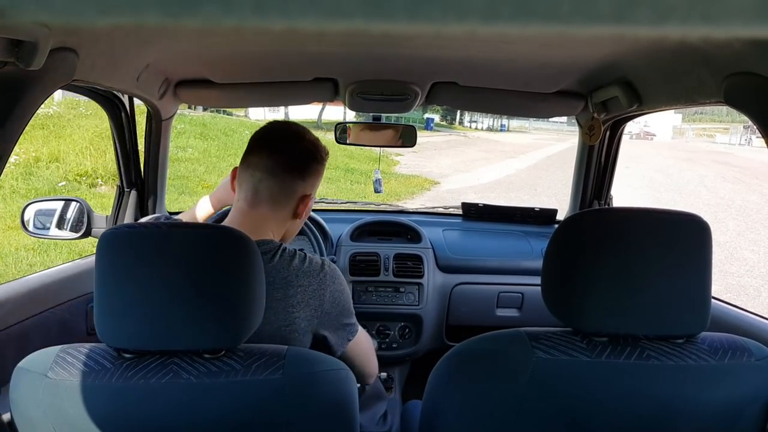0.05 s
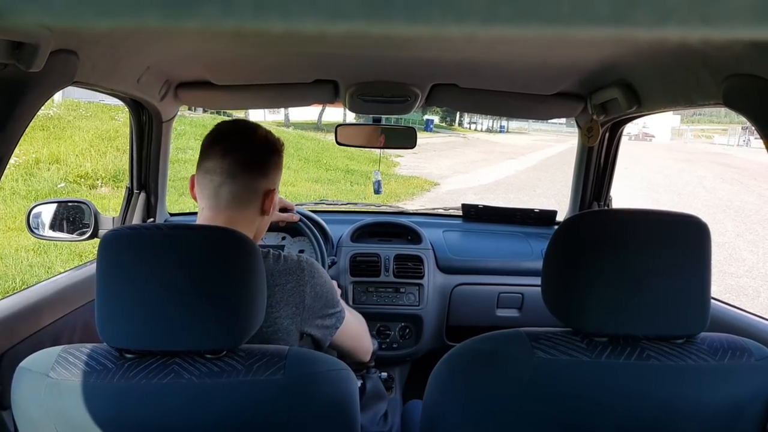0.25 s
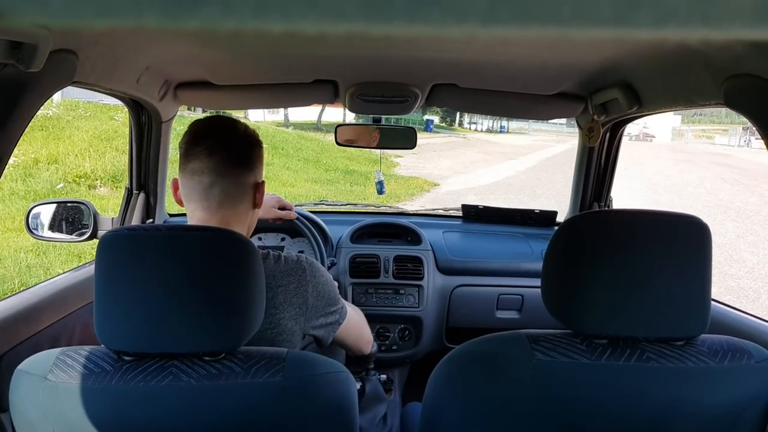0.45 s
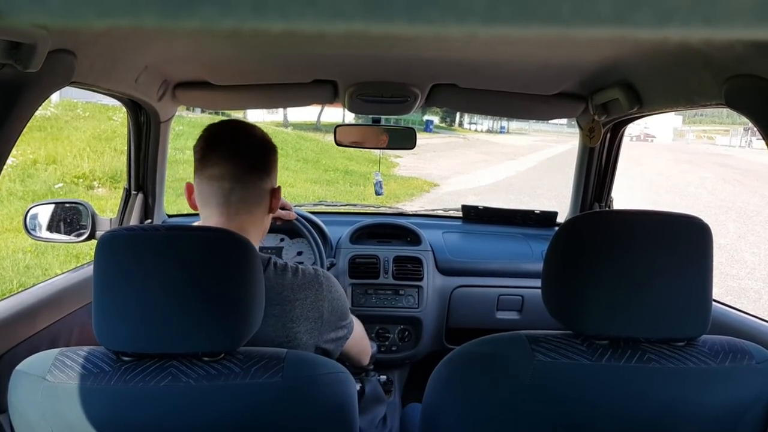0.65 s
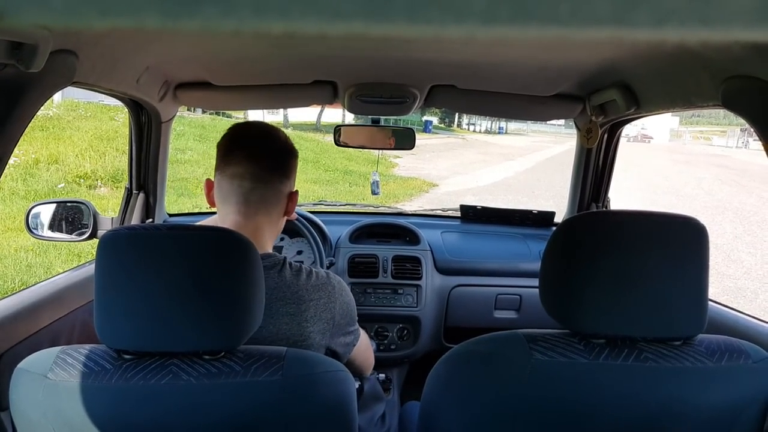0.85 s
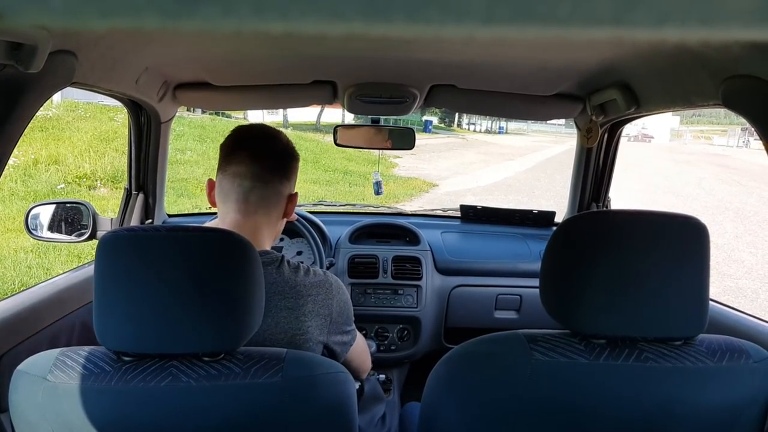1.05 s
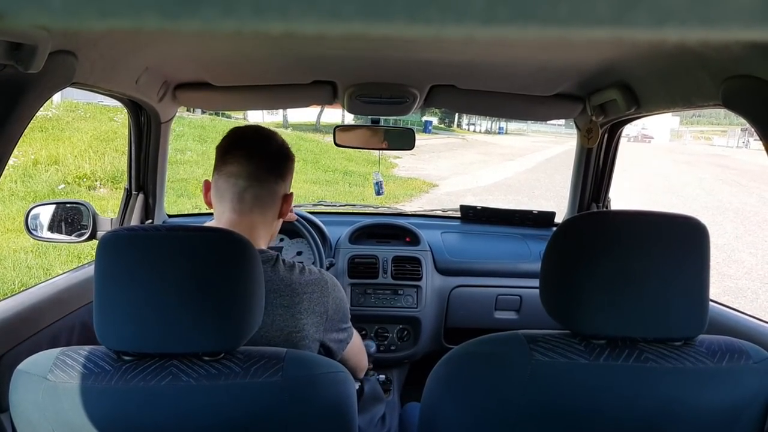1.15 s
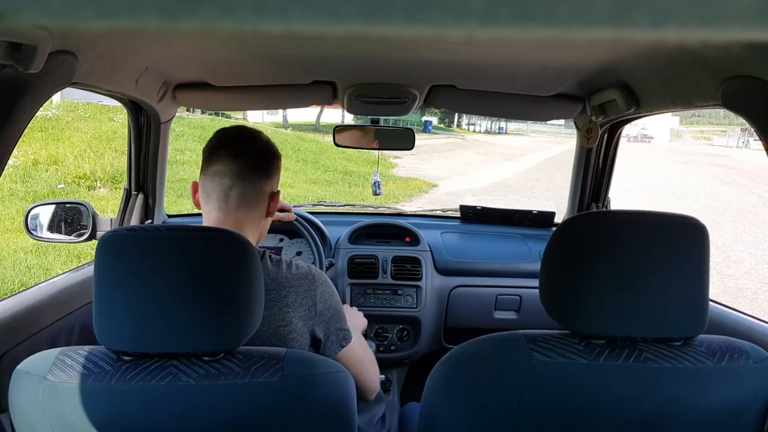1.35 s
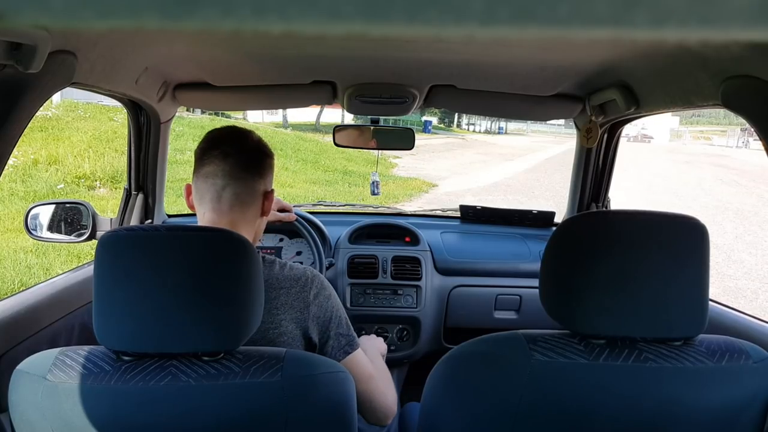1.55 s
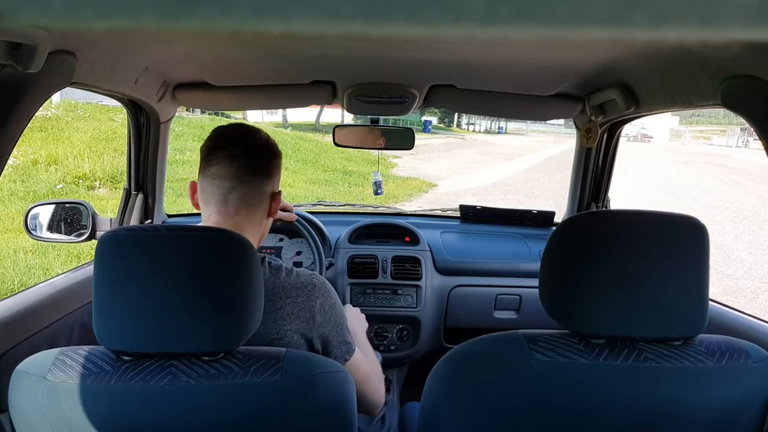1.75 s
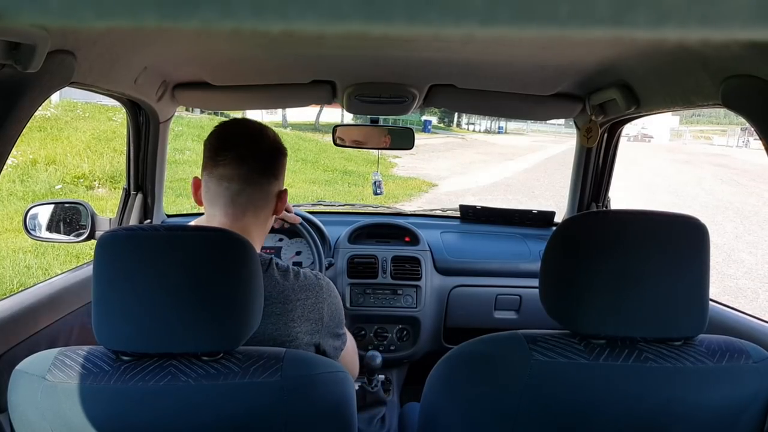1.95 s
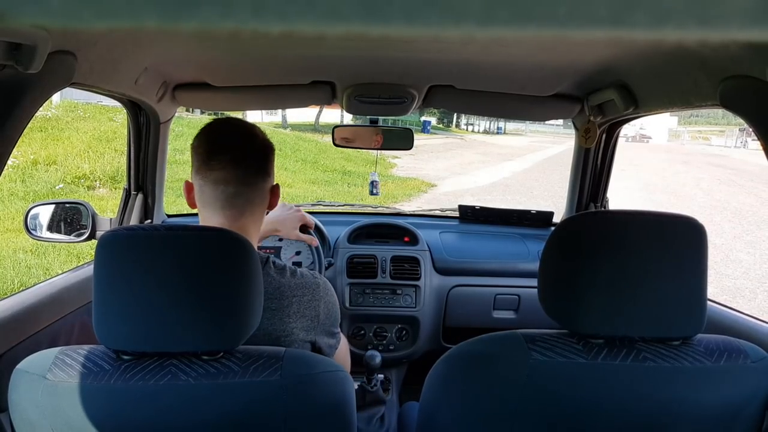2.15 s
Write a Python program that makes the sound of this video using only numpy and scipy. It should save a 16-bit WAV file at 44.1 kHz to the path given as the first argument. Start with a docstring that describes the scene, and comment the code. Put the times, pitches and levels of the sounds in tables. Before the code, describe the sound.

A car door slams shut from inside the cabin, then keys jingle and click in the ignition

```python
"""Car door slam and ignition key

Inside a small car, a stick-slip hinge creak leads to latch and slam: shaped noise, cabin modes and rattles.
The driver settles with dull bumps of low notes and noise; rumble, shuffling and cloth are coloured noise.
Key and lock scrape and click as filtered noise, and the bunch scrapes and jingles on ringing modes.
With the ignition on, the fuel pump's hum swells in as one slightly unsteady sine."""
import sys
import numpy as np
from scipy import signal
from scipy.fft import rfft, irfft, next_fast_len
from scipy.io import wavfile
from scipy.ndimage import map_coordinates

SR = 44100
rng = np.random.default_rng(int(sys.argv[2]) if len(sys.argv) > 2 else 0)


def dump(signal):
    """Clip the signal to [-1, 1] and save it as 16-bit WAV at the path in sys.argv[1]."""
    limited = np.clip(np.atleast_2d(signal).T, -1, 1)
    pcm = np.round(limited * 32767).astype(np.int16)
    wavfile.write(sys.argv[1], SR, pcm)


N = 97020  # samples

# Body rumble: (time [s], level [dB]) and its colour (frequency [Hz], level per Hz [dB])
RUMBLE_LEVEL = [(.2, -44), (.8, -63), (1.15, -37), (1.48, -51.5), (1.55, -31.5), (1.72, -23.5), (2.0, -39)]
RUMBLE_SPECTRUM = [(22, -6), (60, -2.5), (110, -14)]
# The driver's movement: (time [s], level [dB]) and its colour (frequency [Hz], level per Hz [dB])
SHUFFLE_LEVEL = [(.2, -42.5), (.9, -42.5), (1.1, -35.5), (1.3, -38), (1.85, -29.5), (1.97, -39.5)]
SHUFFLE_SPECTRUM = [(110, 13), (175, 6.5), (430, -17.5), (600, -17), (1100, -33.5), (2000, -41.5)]
# Rustle of the sleeve: (time [s], level [dB]) and its colour (frequency [Hz], level per Hz [dB])
CLOTH_LEVEL = [(0, -63), (.05, -54), (.55, -70), (.85, -60), (.93, -65.5), (1.9, -62.5)]
CLOTH_SPECTRUM = [(3500, -7.5), (14000, -7)]
# Outdoor noise through the open door: (frequency [Hz], level per Hz [dB])
OUTSIDE_SPECTRUM = [(200, 0), (700, -4.5), (2500, -26.5)]
OUTSIDE_DB = -46.5
# Stereo width of all noise: (frequency [Hz], side over mid [dB])
STEREO_WIDTH = [(40, -43.5), (140, -15), (550, -8), (1000, 0)]

PUMP_S, PUMP_RISE_S, PUMP_HZ, PUMP_DB = 1.433, 0.23, 252.6, -38.5

# Dull bumps of pedals, seat and gear lever: (time [s], level [dB], pitch [Hz])
BUMP_HITS = [(.082, -30, 148.7), (0.708, -34.5, 162.6), (.939, -20.5, 181.7), (1.222, -28, 207),
             (1.348, -24, 135), (1.535, -24.5, 155.4), (1.769, -24.5, 165.7), (1.874, -22.5, 169.4),
             (2.0, -28, 189)]
# Noise of a bump: (frequency [Hz], level per Hz [dB])
BUMP_SPECTRUM = [(100, 0), (230, -3), (400, -17.5), (1700, -52), (12000, -57.5)]

# Keys knocking together: (time [s], level [dB])
KEY_CONTACTS = [(1.345, -35), (1.515, -27), (1.575, -38.5), (1.617, -40), (1.661, -18.5), (1.680, -18.5),
                (1.692, -21.5), (1.757, -21), (2.046, -26), (2.098, -24)]
# Ringing modes of the keys: (frequency [Hz], level [dB], t60 [s])
KEY_MODES = [(6735, -17, .12), (7750, -11, .15), (10850, -8, .11), (12050, -7, .08), (13160, -3, .09),
             (14990, 2, .08)]
# Grainy clash of metal: (frequency [Hz], level per Hz [dB])
CLASH_SPECTRUM = [(3300, -12), (9500, -15), (11200, 3.5), (15500, -13.5)]
KEY_HARD_DB = -10.5  # contact level at which the key modes keep their listed balance
KEY_BRIGHTENING = 0.44  # dB per octave of tilt for each dB harder

# Clicks of key and lock: (time [s], plastic level [dB], snap level [dB], metal tick level [dB])
LOCK_CLICKS = [(0.605, -55, -65, -42), (.648, -36.5, -69, -56), (.726, -34, -39.5, -29.5),
               (1.107, -29.5, -40, -38), (1.157, -28.5, -34.5, -32.5), (1.226, -27.5, -31.5, -33.5),
               (1.265, -51, -47.5, -46.5), (1.484, -25, -18.5, -33), (1.498, -23, -36.5, -37.5),
               (1.599, -30.5, -39.5, -59), (2.038, -33, -34.5, -22), (2.091, -23, -20, -22),
               (2.127, -40, -31, -48)]
# Scraping of the key in the lock and of the keys against each other:
# (start [s], end [s], plastic level [dB], metal level [dB])
KEY_SCRAPES = [(1.076, 1.282, -41.5, -50), (1.631, 1.816, -49, -42), (2.018, 2.079, -33.5, -34.5)]
# Steering column, lock housing and metal tick: each (frequency [Hz], level per Hz [dB])
PLASTIC_SPECTRUM = [(440, -0.5), (590, 21), (850, -18), (1090, 9), (1350, -48)]
SNAP_SPECTRUM = [(800, 1.5), (1130, 7.5), (1350, -6.5), (1700, -1.5), (2900, -19), (5400, -7)]
TICK_SPECTRUM = [(2000, -6.5), (4600, 5), (6200, -1), (7600, 12), (9000, 3.5), (14000, 8.5)]

# Hinge creak as the door swings: (time [s], pitch [Hz], level [dB])
HINGE_CREAK = [(.14, 815, -49), (.170, 840.5, -30), (.19, 879, -37), (.208, 855, -33.5),
               (.226, 1100, -18.5)]
CREAK_OVERTONE_DB = -17  # beside the fundamental
CREAK_GRIT_DB = -12  # beside the tonal squeak

# Latch and slam: each (frequency [Hz], level per Hz [dB])
LATCH_SPECTRUM = [(120, 4), (430, -11), (600, -2.5), (850, -10), (1150, -11.5), (1600, -30.5),
                  (3500, -40.5), (8000, -55)]
SLAM_SPECTRUM = [(25, 5.5), (140, 3.5), (300, -7), (470, -16), (600, -3.5), (800, -15), (1100, -16.5),
                 (1500, -29), (14000, -91.5)]
# Decay of the slam: (frequency [Hz], t60 [s])
SLAM_DECAY = [(40, 1), (900, 0.39), (4000, 0.93)]
# Air modes of the closed cabin: (frequency [Hz], level [dB], t60 [s])
CABIN_MODES = [(58.14, -5, 0.92), (133.3, 1, 0.4), (161.7, -10.5, 0.79), (236.2, -10, 0.41)]
# Clatter of the door and its trim: (time [s], level [dB])
RATTLE_HITS = [(0.245, -7.5), (.305, -21.5), (.345, -18), (.385, -25), (.447, -28)]
# Rattling trim: (frequency [Hz], level per Hz [dB])
RATTLE_SPECTRUM = [(500, 16.5), (1100, 1), (1700, -5.5), (4800, -11), (15000, -29.5)]
LATCH_S, LATCH_DB, LATCH_T60_S = .2265, -5.5, 0.12
SLAM_S, SLAM_DB, SLAM_HOLD_S = .243, -9.5, 0.037
BOOM_DB, BOOM_RISE_S = -2, 0.011
CHATTER_DB, CHATTER_FALL_DB_PER_S, CHATTER_FADE_S = -29.5, 63, 0.443  # the last is when the fade-out starts

TOP_HZ = 15850  # band limit


def amp(db):
    """Turn decibels into gain."""
    return 10 ** (np.asarray(db) / 20)


def unit(x):
    """Scale to rms 1."""
    return x / np.sqrt(np.mean(x ** 2) + 1e-20)


def along(points, hz):
    """Read (Hz, value) points along a log frequency axis."""
    f, v = np.transpose(points)
    return np.interp(np.log(hz + 1), np.log(f + 1), v)


def curves(rows):
    """Draw one automation curve for each column after the time."""
    times, *columns = np.transpose(rows)
    return [np.interp(np.arange(N) / SR, times, column) for column in columns]


def wobble(rate):
    """Draw a smooth random curve with rate knots a second."""
    knots = rng.standard_normal(4096)
    return map_coordinates(knots, [np.arange(N) * rate / SR], mode="wrap")


def add(out, s, x):
    """Mix x into out from time s."""
    i = max(0, round(s * SR))
    out[:, i:i + x.shape[1]] += x[:, :max(0, N - i)]


def pan(x, left_db):
    """Lean a stereo sound to the left by a level difference; negative leans right."""
    return x * amp([[left_db / 2], [-left_db / 2]])


def noise(spectrum, size=N):
    """Random-phase stereo noise of rms 1, narrow in the bass and wide in the treble."""
    hz = np.fft.rfftfreq(size, 1 / SR)
    low_skirt = 1 / (1 + (spectrum[0][0] / (hz + 1)) ** 6)
    high_skirt = 1 / (1 + (hz / spectrum[-1][0]) ** 8)
    colour = low_skirt * high_skirt * amp(along(spectrum, hz))
    phases = np.exp(2j * np.pi * rng.random((2, len(hz))))
    side_gain = amp(along(STEREO_WIDTH, hz))
    mid, side = irfft(phases * colour * [np.ones(len(hz)), side_gain], size)
    return unit(np.array([mid + side, mid - side]))


def burst(spectrum, t60, rise_s, tail_db):
    """A knock on dense resonances: decaying noise with the cabin's short tail."""
    t = np.arange(SR // 3) / SR
    attack = (1 - np.exp(-t / rise_s)) ** 2
    decay = amp(-60 * t / t60) + amp(tail_db - 60 * t / 0.25)
    return noise(spectrum, size=len(t)) * attack * decay


def ring(modes, rise_s, spread, scatter_db=0, detune=0):
    """Decaying sine modes; spread [rad] scales a random phase in each ear."""
    t = np.arange(SR) / SR
    attack = (1 - np.exp(-t / rise_s)) ** 2
    chance = rng.standard_normal((len(modes), 4, 1))  # level, tuning, left phase, right phase
    total = np.zeros((2, len(t)))
    for (hz, db, t60), c in zip(modes, chance):
        decay = amp(db + scatter_db * c[0] - 60 * t / t60)
        total += decay * np.sin(2 * np.pi * hz * (1 + detune * c[1]) * t + spread * c[2:])
    return attack * total


def background():
    """Coloured noise for body rumble, the driver's shuffling and sleeve, and outdoors until the door shuts."""
    t = np.arange(N) / SR
    unrest_db = 2 * wobble(30)
    rumble = amp(curves(RUMBLE_LEVEL)[0]) * noise(RUMBLE_SPECTRUM)
    shuffle = amp(curves(SHUFFLE_LEVEL)[0] + unrest_db) * noise(SHUFFLE_SPECTRUM)
    cloth = amp(curves(CLOTH_LEVEL)[0] + wobble(47)) * noise(CLOTH_SPECTRUM)
    door_open = np.clip((SLAM_S - t) / .02, 0, 1)
    outside = amp(OUTSIDE_DB) * door_open * noise(OUTSIDE_SPECTRUM)
    return pan(rumble + shuffle + cloth + outside, left_db=1.5)


def pump():
    """The fuel pump swells in as a hum, slightly unsteady in pitch and level."""
    on = np.clip((np.arange(N) / SR - PUMP_S) / PUMP_RISE_S, 0, 1)
    phase = 2 * np.pi * np.cumsum(PUMP_HZ * (1 + .004 * wobble(20))) / SR
    return amp(PUMP_DB + wobble(12)) * on * np.sin(phase)


def bumps():
    """Soft blows on the floor and console, each a short low note with a dull noise burst."""
    out = np.zeros((2, N))
    for s, db, hz in BUMP_HITS:
        add(out, s, amp(db + 12.5) * ring([(hz, 0, .11)], rise_s=0.0097, spread=0.14))
        add(out, s, amp(db + 5) * burst(BUMP_SPECTRUM, t60=0.099, rise_s=0.0082, tail_db=-27))
    return out


def jingle():
    """Every contact in the bunch rings the keys anew over a grainy clash; harder contacts ring brighter."""
    ringing, clash = np.zeros((2, 2, N))
    top_hz = KEY_MODES[-1][0]
    for s, db in KEY_CONTACTS:
        tilt = KEY_BRIGHTENING * (db - KEY_HARD_DB)
        modes = [(hz, level + tilt * np.log2(hz / top_hz), t60) for hz, level, t60 in KEY_MODES]
        add(ringing, s, amp(db - 11) * ring(modes, rise_s=.002, spread=.9, scatter_db=3, detune=.003))
        add(clash, s, amp(db - 7) * burst(CLASH_SPECTRUM, t60=0.06, rise_s=0.0046, tail_db=-23))
    grain = amp(3 * wobble(700))
    return pan((ringing + clash) * grain, left_db=-3)


def clicks_and_scrapes():
    """Clicks join a metal tick, a snap and a plastic knock; key and bunch scrape in swells of noise."""
    smooth = np.zeros((2, N))
    gritty = np.zeros((2, N))
    for s, plastic_db, snap_db, tick_db in LOCK_CLICKS:
        add(smooth, s, amp(plastic_db) * burst(PLASTIC_SPECTRUM, t60=0.076, rise_s=0.0038, tail_db=-12.5))
        add(smooth, s, amp(snap_db) * burst(SNAP_SPECTRUM, t60=0.05, rise_s=0.0023, tail_db=-20))
        add(gritty, s, amp(tick_db) * burst(TICK_SPECTRUM, t60=0.051, rise_s=0.0021, tail_db=-15.5))
    for start, end, plastic_db, metal_db in KEY_SCRAPES:
        progress = np.clip((np.arange(N) / SR - start) / (end - start), 0, 1)
        scrape = amp(plastic_db) * noise(PLASTIC_SPECTRUM) + amp(metal_db) * noise(CLASH_SPECTRUM)
        gritty += np.sin(np.pi * progress) * scrape
    return smooth + gritty * amp(2.5 * wobble(900))


def hinge():
    """Rough stick-slip squeak: a jittery tone with overtones and grit, rising as the door swings shut."""
    hz, db = curves(HINGE_CREAK)
    t = np.arange(N) / SR
    phase = 2 * np.pi * np.cumsum(hz * (1 + .045 * wobble(900))) / SR
    fade_in = np.clip((t - HINGE_CREAK[0][0]) / 0.02, 0, 1)
    fade_out = np.clip((HINGE_CREAK[-1][0] - t) / 0.006 + 1, 0, 1)
    overtones = sum(np.sin(k * phase) / k for k in range(2, 6))
    tone = unit(np.sin(phase) + amp(CREAK_OVERTONE_DB) * overtones)
    squeak = tone + amp(CREAK_GRIT_DB) * noise(RATTLE_SPECTRUM)
    return squeak * fade_in * fade_out * amp(db + 3 * wobble(150))


def latch():
    """The latch catches: one sharp knock of noise on dense resonances."""
    out = np.zeros((2, N))
    knock = burst(LATCH_SPECTRUM, t60=LATCH_T60_S, rise_s=0.0013, tail_db=-47.5)
    add(out, LATCH_S, amp(LATCH_DB) * knock)
    return out


def slam():
    """The door hits its seal: noise that holds, then dies at its own rate in each band."""
    out = np.zeros((2, N))
    hz, t, bands = signal.stft(noise(SLAM_SPECTRUM, size=SR), SR, nperseg=1024)
    fall = amp(-60 * np.maximum(t - SLAM_HOLD_S, 0) / along(SLAM_DECAY, hz)[:, None])
    panel = signal.istft(bands * fall, SR, nperseg=1024)[1]
    attack = np.minimum(np.arange(panel.shape[1]) / SR / 0.0035, 1)
    add(out, SLAM_S, amp(SLAM_DB) * panel * attack)
    return out


def cabin_boom():
    """The slam sets the cabin air booming on its low modes."""
    out = np.zeros((2, N))
    add(out, SLAM_S, amp(BOOM_DB) * ring(CABIN_MODES, rise_s=BOOM_RISE_S, spread=0.16))
    return out


def trim():
    """Door and trim rattle in separate knocks and chatter as flickering noise until they settle."""
    out = np.zeros((2, N))
    for s, db in RATTLE_HITS:
        add(out, s, amp(db) * burst(RATTLE_SPECTRUM, t60=0.045, rise_s=0.0024, tail_db=-59))
    age = np.arange(N) / SR  # since the slam
    settling = np.clip((CHATTER_FADE_S - SLAM_S - age) / 0.051 + 1, 0, 1)
    chatter_db = CHATTER_DB - CHATTER_FALL_DB_PER_S * age + 4 * wobble(160)
    add(out, SLAM_S, amp(chatter_db) * settling * noise(RATTLE_SPECTRUM))
    return out


def door():
    """Latch, slam, cabin boom and trim together, a little to the left."""
    return pan(latch() + slam() + cabin_boom() + trim(), left_db=0.8)


def scene():
    """Mix all layers, from the background to the door."""
    return background() + pump() + bumps() + jingle() + clicks_and_scrapes() + hinge() + door()


def record(dry):
    """Softly clip the peaks, then cut everything above the band limit."""
    clipped = dry / (1 + np.abs(dry) ** 8) ** (1 / 8)
    size = next_fast_len(N + SR // 4)
    passband = np.fft.rfftfreq(size, 1 / SR) < TOP_HZ
    return irfft(rfft(clipped, size) * passband, size)[:, :N]


dry = scene()
out = record(dry)
dump(out)
```